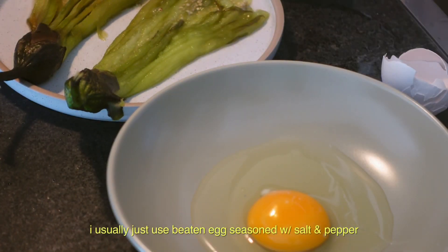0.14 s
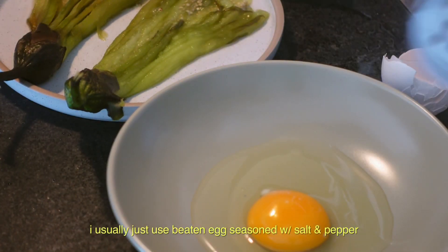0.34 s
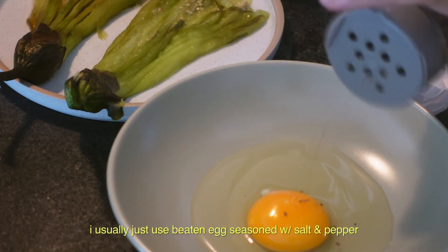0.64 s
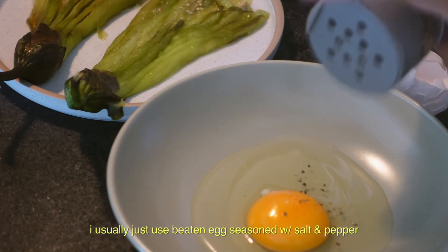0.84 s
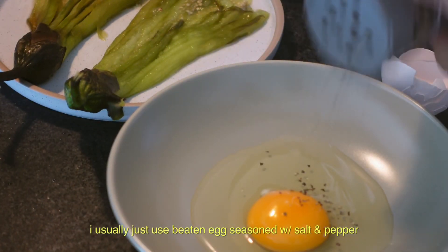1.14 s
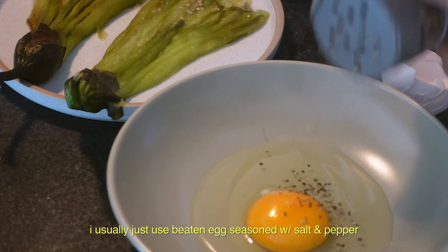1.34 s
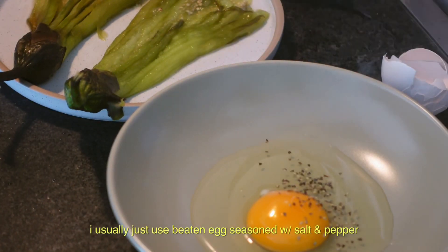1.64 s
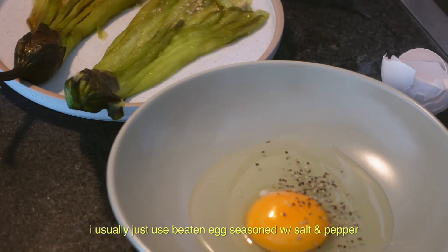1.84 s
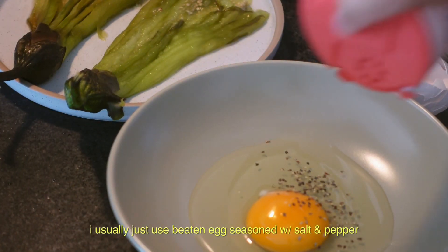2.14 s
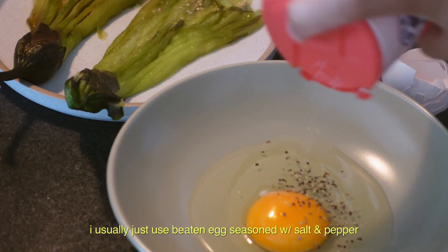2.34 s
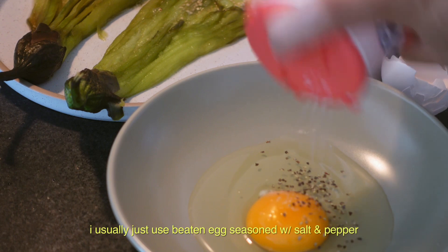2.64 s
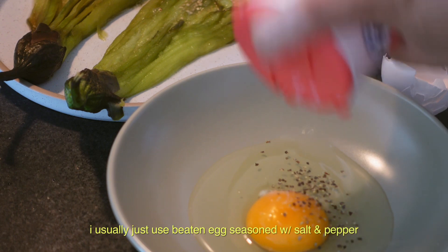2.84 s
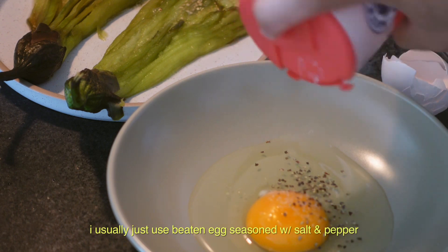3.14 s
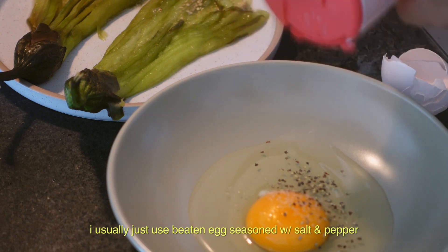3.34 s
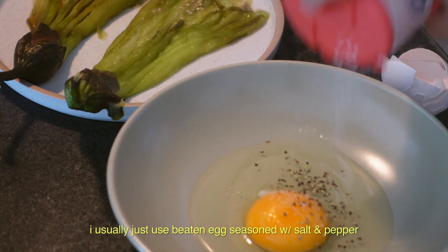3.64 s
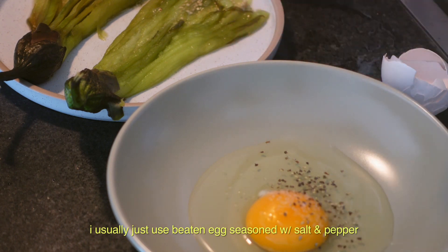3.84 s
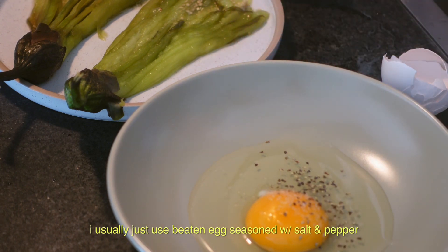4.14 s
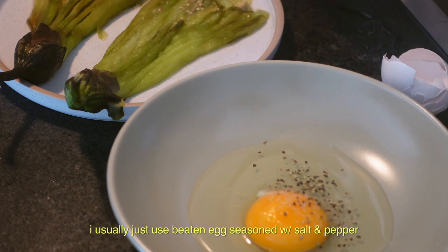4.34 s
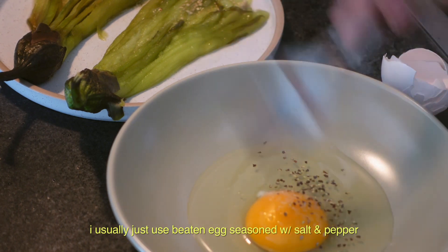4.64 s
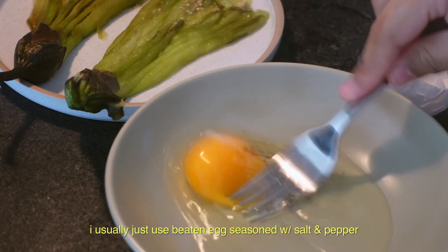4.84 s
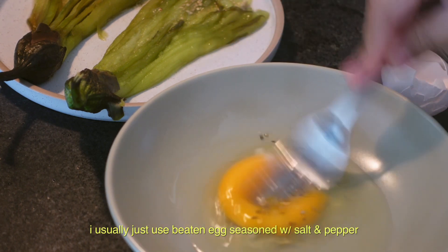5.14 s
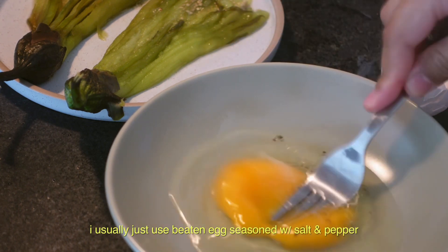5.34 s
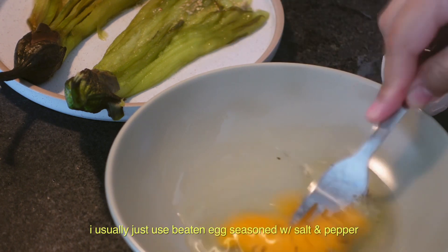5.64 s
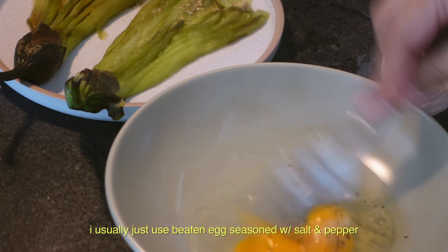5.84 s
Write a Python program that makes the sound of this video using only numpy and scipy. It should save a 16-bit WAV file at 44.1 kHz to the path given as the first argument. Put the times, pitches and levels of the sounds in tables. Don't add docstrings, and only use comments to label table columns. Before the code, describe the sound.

In a quiet kitchen, faint pepper shakes give way to brighter salt shakes, a sudden cut, then fork clinks and loud beating strokes.

```python
import sys
import numpy as np
from scipy import signal
from scipy.fft import rfft, irfft, next_fast_len
from scipy.io import wavfile
from scipy.ndimage import uniform_filter1d

SR = 44100
rng = np.random.default_rng(int(sys.argv[2]) if len(sys.argv) > 2 else 0)


def int16_out(signal):
    q = np.round(np.clip(np.atleast_2d(signal).T, -1, 1) * 32767)
    wavfile.write(sys.argv[1], SR, q.astype(np.int16))


def makeup_ratio(level_db):
    decades = np.asarray(level_db, float) / 20
    return 10 ** decades


N = 263718
CUT_S = 4.245


TRICKLE_DB = -83


def tumbling_grains(rows, times, tone, low_hz, high_hz, impacts, rattle_db):
    start, tipped, end = times
    t = np.arange(start, end, 1 / SR)
    power = swells(t, rows)
    flow = power.sum(0) + makeup_ratio(TRICKLE_DB) ** 2

    lag_s, tipping_s, upright_db = .02, .07, -19
    keep = np.exp(-1 / (lag_s * SR))
    lagged_flow = signal.lfilter([1 - keep], [1, -keep], flow)
    upright = np.clip((tipped - t) / tipping_s, 0, 1)
    rattle = makeup_ratio(rattle_db + upright_db * upright) * np.sqrt(lagged_flow)
    sizzle_over_flow = makeup_ratio([row[-1] for row in rows]) ** 2
    sizzle = np.sqrt(sizzle_over_flow @ power + makeup_ratio(TRICKLE_DB - 7) ** 2)

    def low(f):
        return 1 / (1 + (f / low_hz) ** 8)

    def high(f):
        return 1 - 1 / (1 + (f / high_hz) ** 12)

    def middle(f):
        return abs(1 - low(f) - high(f))

    x = impacts(len(t))
    total = np.zeros(len(t))
    for share, gain in [(low, rattle), (middle, np.sqrt(flow)), (high, sizzle)]:
        band = coloured(x, lambda f: makeup_ratio(read(tone[:-1], f)) * (f < 15850) * np.sqrt(share(f)))
        total += evened(band) * gain
    return start, total * signal.windows.tukey(len(t), .004)


# (peak time [s], grain flow [dB], rise [s per 10 dB], fall [s per 10 dB], sizzle over flow [dB])
PEPPER = [(0.002, -62, .01, .03, -16), (0.05, -68, .05, .045, -5), (0.25, -71, .03, .2, 1),
          (0.332, -56.5, .03, .038, -11), (0.474, -61.5, .045, .03, -4), (0.588, -62, .05, .04, -11),
          (1.058, -61.5, .055, .06, -11), (1.13, -62, .025, .03, -11), (1.182, -54, .009, .045, -9),
          (1.275, -67, .03, .085, -10), (1.645, -61, .022, .13, -8), (1.833, -66.5, .03, .015, -8)]
SALT = [(1.948, -46.5, .028, .2, -11), (2.07, -41.5, .12, .12, -10), (2.218, -41.5, .12, .08, -13),
        (2.376, -47, .2, .06, -11), (2.48, -38, .025, .018, -13), (2.62, -42.5, .13, .06, -10),
        (2.744, -46.5, .15, .055, -8), (2.816, -47.5, .013, .1, -8), (2.888, -42.5, .08, .045, -7),
        (3.018, -35, .055, .034, -8), (3.164, -52.5, .2, .05, -10), (3.288, -55, .02, .03, -10),
        (3.375, -41, .009, .05, -6), (3.44, -34.5, .04, .085, -5), (3.56, -39, .03, .2, -9),
        (3.625, -38.5, .2, .05, -6), (3.795, -60, .05, .07, -14), (3.92, -54, .035, .15, -18),
        (4.135, -30.5, .095, .07, -16)]
# (frequency [Hz], level [dB per Hz])
PEPPER_TONE = [(1470, -60), (2500, -18), (2930, -8.5), (3290, -18.5), (4530, -18), (6090, -3), (6620, -5.5),
               (8320, -2), (15400, -13)]
SALT_TONE = [(590, -29), (1000, -25), (1490, -22), (1750, -14), (2080, -12), (2410, -4.5), (2710, -4.5),
             (2970, -5), (3730, -4.5), (6100, 4), (7930, 4), (12500, -1.5), (15400, -13)]
# (start [s], tipped over [s], end [s])
PEPPER_S = (0, .48, 1.9)
SALT_S = (1.88, 2.02, 4.25)


def shakers():
    out = np.zeros(N)
    pepper = tumbling_grains(PEPPER, PEPPER_S, PEPPER_TONE, 5200, 10300,
                             lambda n: grit(n, 2.5, 9000), rattle_db=-6)
    salt = tumbling_grains(SALT, SALT_S, SALT_TONE, 3990, 11140,
                           lambda n: grit(n, 0.59, 14000), rattle_db=-5)
    add(out, *pepper)
    add(out, *salt)
    return out


# (frequency [Hz], width [Hz], level [dB])
BOWL = [(543, 54, -0.5), (756, 51, 3), (1194, 88, 4), (1804, 48, -8), (1900, 54, -13)]


def strike(row, peaks, crack_db, tick, rise_s=.0002):
    s, peak_db, drag_db, drag_s, tilt_db, bowl_db = row
    t = np.arange(int(.35 * SR)) / SR
    peaks = [(hz, np.hypot(width, 45.), db) for hz, width, db in peaks]

    chatter = np.exp(-t / 0.0049) * (1 - np.exp(-t / rise_s))
    release = 1 + np.exp(np.clip((t - drag_s) / 0.0065, -30, 30))
    drag = makeup_ratio(drag_db - 52 * t) / release * (1 - np.exp(-t / (6 * rise_s)))
    glaze = [(3100, 1400, 5.5), (4070, 22000, 1.5)]  # (frequency [Hz], width [Hz], level [dB])
    rub = evened(coloured(grit(len(t), 3.6, 15000), lambda f: humps(glaze, f)))
    force = grit(len(t), 2.87, 22000) * chatter + rub * drag + tick * (t == 0)

    def edges(f):
        tilt = makeup_ratio(tilt_db * np.log2((f + 2000) / 6000))
        return tilt / np.sqrt((1 + (2960.0 / (f + 1)) ** 8) * (1 + (f / 11300.0) ** 4))

    ringing = causal(lambda f: np.hypot(humps(peaks, f), makeup_ratio(crack_db)) * edges(f))
    body = causal(lambda f: humps(BOWL, f) ** 1.37 * f / (f + 400))
    sound = signal.fftconvolve(force, ringing)[:len(t)]
    low = signal.fftconvolve(force, body)[:len(t)]
    return s, makeup_ratio(peak_db) * (sound / abs(sound).max() + makeup_ratio(bowl_db) * low / abs(low).max())


# (frequency [Hz], width [Hz], level [dB])
SLIDE_TINES = [(3140, 26, 4), (5230, 70, -1), (5990, 45, -19), (7120, 63, -10), (7690, 100, -10),
               (8080, 77, -14), (9670, 60, -17), (10300, 45, -9), (12600, 110, -19), (13500, 82, -21)]
SLIDE_BOWL = [(763, 67, -0.5), (1060, 46, 2.5), (1260, 49, -1.5), (1780, 39, -6.5)]
# (peak time [s], level [dB], rise [s per 10 dB], fall [s per 10 dB])
SQUEAL = [(4.72, -54, .035, .2), (4.775, -48.5, .08, .14)]
RUMBLE = [(4.61, -63, .01, .1), (4.76, -51, .09, .25)]
SLIDE_S = 4.58, 4.855
# (time [s], peak [dB], drag under the blow [dB], drag [s], tilt [dB per octave])
BLOWS = [
    (4.8604, -26.5, -18, 0.053, 2.3),
    (5.1243, -34.5, -3.5, 0.011, 6.3),
    (5.1648, -20.5, -20, 0.053, 0.5),
    (5.2961, -15, -17.5, 0.057, 3.5),
    (5.6155, -7.5, -13, 0.07, -2.1),
    (5.7866, -2.5, -18.5, 0.08, -3.8),
    (5.949, -2.5, -10.5, 0.084, -2.2),
]
# (frequency [Hz], width [Hz], level [dB])
TAP_RINGS = [
    [(3400, 33, 10), (5280, 45, 3), (7270, 66, 12), (7900, 23, -8), (8380, 27, 0.5), (9980, 80, 5.5),
     (10100, 45, -14)],
    [(3210, 61, 9), (12300, 130, -14)],
    [(3170, 93, 1), (4520, 100, -15), (5160, 66, -14), (7200, 27, -3.5), (7050, 57, -3), (8360, 32, -4),
     (9200, 79, -5), (9740, 53, -7), (11300, 27, -8), (11800, 32, -11), (12500, 170, -7)],
    [(3240, 86, 8.5), (3250, 32, -5), (5050, 120, -3.5), (6896, 70, 1), (7370, 65, 0), (8100, 110, -6),
     (9100, 77, -6), (9640, 51, 1), (10090, 55, 3.5), (11500, 29, -3), (12300, 48, -4)],
]
BEAT_RINGS = [
    [(2965, 45, -11), (3170, 21, -6.5), (3416, 20, 2), (5130, 69, -9), (6100, 76, -5), (6860, 170, -4.5),
     (7790, 59, -4), (7440, 200, -2.5), (8000, 36, -5), (9830, 56, -5), (10120, 42, -4), (11500, 240, -11),
     (12800, 68, -4), (13300, 48, -15)],
    [(3260, 60, -6.5), (3520, 23, -10), (4310, 100, -11), (5330, 150, -10), (6070, 30, -11),
     (6700, 31, -4.5), (7250, 46, -3.5), (7560, 43, -9), (7960, 63, 1), (9400, 26, -7.5), (10200, 47, -2.5),
     (11500, 42, -2), (12500, 89, -6), (13400, 290, -12.5)],
    [(3410, 65, -8.5), (4130, 89, -10.5), (6210, 23, -8), (7270, 43, -6.5), (8200, 19, -1.5),
     (10520, 47, -5), (12150, 23, -4)],
]
# (time [s], peak [dB], drag [s])
SCUFFS = [
    (5.012, -30.5, .03),
    (5.463, -40, .014),
    (5.485, -29.5, .018),
    (5.505, -44, .09),
]
# (frequency [Hz], width [Hz], level [dB])
SCUFF_RINGS = [[(2400, 62, -8), (3265, 90, -6.5), (5140, 66, -8), (7260, 37, -5), (8060, 74, -8),
               (9780, 30, -2), (12000, 61, -8)]] + [[(2410, 350, -4), (3250, 180, -3), (5060, 150, -4),
               (6240, 160, 3.5), (7160, 200, -3)]] * len(SCUFFS)
# (time [s], level [dB], frequency [Hz], T60 [s])
PLOPS = [
    (5.726, -43, 2060, .16),
    (5.726, -35, 2250, .015),
    (5.788, -48.5, 1162, 1.2),
    (5.788, -49.5, 1168.5, 1.2),
    (4.862, -58, 8200, .7),
]


def fork():
    out = np.zeros(N)
    t = np.arange(*SLIDE_S, 1 / SR)
    rub = grit(len(t), 1.0, 5100)
    for peaks, rows in (SLIDE_TINES, SQUEAL), (SLIDE_BOWL, RUMBLE):
        singing = evened(coloured(rub, lambda f: humps(peaks, f) ** 1.25))
        pressure = np.sqrt(swells(t, rows).sum(0))
        add(out, t[0], singing * pressure * signal.windows.tukey(len(t), .06))

    for row, peaks in zip(BLOWS, TAP_RINGS + BEAT_RINGS):
        peak_db, tilt_db = row[1], row[-1]
        bowl_db = -45 - 3 * tilt_db - peak_db
        add(out, *strike((*row, bowl_db), peaks, crack_db=-21, tick=5.36))
    for (s, db, drag_s), peaks in zip(SCUFFS, SCUFF_RINGS):
        row = s, db, 3.5, drag_s, -.5, -31
        add(out, *strike(row, peaks, crack_db=-31, tick=0, rise_s=0.0025))

    t = np.arange(8000) / SR
    for s, db, hz, t60 in PLOPS:
        onset = 1 - np.exp(-t / 0.00052)
        add(out, s, makeup_ratio(db - 60 * t / t60) * np.sin(2 * np.pi * hz * t) * onset)
    return out


def knock(row, peaks):
    s, peak_db, rattle_db, rattle_s = row
    t = np.arange(6000) / SR
    force = rng.standard_normal(len(t)) * makeup_ratio(rattle_db) * np.exp(-t / rattle_s)
    force[[0, 75]] += 1, .7
    shell = causal(lambda f: humps(peaks, f) ** 1.45 * f / (f + 900) / (1 + (f / 34000.0) ** 4))
    sound = signal.fftconvolve(force, shell)[:len(t)]
    return s, makeup_ratio(peak_db) * sound / abs(sound).max()


# (time [s], peak [dB], after-rattle [dB], after-rattle decay [s])
KNOCKS = [
    (1.829, -54.5, -25, .01),
    (3.6453, -12.5, -20, 0.0042),
    (4.1363, -19, -21, .01),
]
# (frequency [Hz], width [Hz], level [dB])
LID = [
    [(2220, 150, -3), (2830, 150, -6), (3600, 200, -11)],
    [(1300, 200, -26), (2330, 320, -2), (3150, 300, -6), (4950, 350, -5), (6700, 400, -6), (8200, 400, -4),
     (10200, 400, -7)],
    [(790, 270, -4), (1120, 310, -3), (2050, 200, -6), (2690, 130, -2), (4640, 540, 4), (6400, 400, 1)],
]


def lid_knocks():
    out = np.zeros(N)
    for row, peaks in zip(KNOCKS, LID):
        add(out, *knock(row, peaks))
    return out


# (frequency [Hz], width [Hz], level [dB])
DYING = [(1350, 87, -16), (2280, 55, -4.5), (2870, 106, -7), (4170, 110, -6.5), (5070, 65, -15),
         (5290, 61, -13), (5500, 40, -8), (6230, 66, 0.5), (7400, 91, -8), (8530, 56, -3.5),
         (9050, 120, -14), (9720, 140, -11), (11900, 160, -26), (12500, 42, -24)]
# (frequency [Hz], T60 [s])
DYING_T60 = [(1000, 1.2), (3000, 1.08), (6000, 0.41), (9000, 0.46), (13000, 0.32)]


def dying_ring():
    hz, t, z = signal.stft(rng.standard_normal(SR), SR, nperseg=512)
    floor = makeup_ratio(-17) * hz / (hz + 12000) * (hz < 14000)
    modes = np.hypot(humps(DYING, hz), floor)[:, None]
    decay = makeup_ratio(-60 * t / read(DYING_T60, hz)[:, None])
    tail = signal.istft(z * modes * decay, SR, nperseg=512)[1]
    out = np.zeros(N)
    add(out, CUT_S, makeup_ratio(-40) * tail / np.std(tail[:2000]))
    return out


# (frequency [Hz], T60 [s])
KITCHEN = [(300, 1), (2000, 0.68), (6000, 0.45), (14000, 0.39)]


def kitchen(x, damping=1):
    taps = np.zeros((2, SR // 2))
    at = np.arange(120, SR // 2 - 20, 20) + rng.integers(0, 20, (2, (SR // 2 - 121) // 20))
    np.put_along_axis(taps, at, rng.choice([-1., 1.], at.shape), 1)
    taps[1] = .85 * taps[0] + .5 * taps[1]
    hz, t, z = signal.stft(taps, SR, nperseg=256)
    decay = makeup_ratio(-60 * damping * t / read(KITCHEN, hz)[:, None])
    tail = signal.istft(z * decay, SR, nperseg=256)[1]
    tail = tail / np.linalg.norm(tail, axis=1)[:, None]
    return signal.fftconvolve(x[None], tail, axes=1)[:, :N]


# (peak time [s], level [dB], rise [s per 10 dB], fall [s per 10 dB],
# frequency [Hz])
HUM = [
    (0.6, -64, .3, .4, 200),
    (2.5, -59, .3, .45, 202),
    (4.29, -53, .04, .15, 205),
    (4.56, -52, .25, .25, 202),
    (5.3, -56, .15, .6, 215),
    (5.9, -60, .4, .3, 243),
]


def drone():
    noise = rng.standard_normal(N)
    bands = [evened(coloured(noise, lambda f: humps([(row[-1], 24, 0)], f) ** 2)) for row in HUM]
    return (np.sqrt(swells(np.arange(N) / SR, HUM)) * bands).sum(0)


# (frequency [Hz], width [Hz], level [dB], fade end [s])
WHINES = [
    (118.4, 6, -70, 4.24),
    (1777, 14, -77, 1.68),
    (5981, 14, -77, 4.24),
    (6202, 14, -81, 4.24),
    (5243, 14, -87, 4.24),
]


def appliances():
    t, out = np.arange(N) / SR, np.zeros(N)
    for hz, width, db, end in WHINES:
        fuzz = evened(coloured(rng.standard_normal(N), lambda f: humps([(hz, width, 0)], f) ** 2))
        whine = 0.96 * np.sin(2 * np.pi * hz * t) + 0.45 * fuzz
        out += makeup_ratio(db) * whine * np.clip((end - t) / 0.024, 0, 1)
    return out


# (frequency [Hz], coherence [0-1])
SAME = [(60, 1), (180, 0.88), (550, 0.77), (1650, 0.76), (4970, 0.74), (15000, 0.99)]


def hush(tone, db):
    frames, hz = N // 256 + 9, np.fft.rfftfreq(1024, 1 / SR)
    a, b, c, d, patches = rng.standard_normal((frames, 513, 5)).T
    patches = uniform_filter1d(patches, size=8, axis=0)
    patches = evened(uniform_filter1d(patches, size=14, axis=1))
    same = np.clip(read(SAME, hz), -1, 1)[:, None]
    left = a + 1j * b
    right = same * left + np.sqrt(1 - same ** 2) * (c + 1j * d)
    z = np.array([left, right]) * makeup_ratio(read(tone, hz)[:, None] + 1.65 * patches)
    return makeup_ratio(db) * evened(signal.istft(z, nperseg=1024, noverlap=768)[1][:, :N])


def evened(x):
    return x / np.sqrt(np.mean(x ** 2) + 1e-20)


def read(points, hz):
    f, value = np.transpose(points)
    return np.interp(np.log(hz + 1), np.log(f + 1), value)


def add(mix, s, sound):
    part = mix[round(s * SR):][:len(sound)]
    part += sound[:len(part)]


def coloured(x, gain):
    size = next_fast_len(len(x), True)
    return irfft(rfft(x, size) * gain(np.fft.rfftfreq(size, 1 / SR)), size)[:len(x)]


def humps(peaks, hz):
    return np.sqrt(sum(makeup_ratio(db) ** 2 / (1 + (2 * (hz - f) / width) ** 2) for f, width, db in peaks))


def grit(size, spread_db, per_s):
    big = makeup_ratio(spread_db * np.minimum(rng.exponential(1, size), 4))
    return evened(rng.standard_normal(size) * big * (rng.random(size) < per_s / SR))


def causal(gain, size=8192):
    cepstrum = irfft(np.log(gain(np.fft.rfftfreq(size, 1 / SR)) + 1e-5), size)
    cepstrum[1:size // 2] *= 2
    cepstrum[size // 2 + 1:] = 0
    response = irfft(np.exp(rfft(cepstrum)), size)
    return response / np.linalg.norm(response)


def swells(t, rows):
    s, db, rise_s, fall_s = np.transpose(rows)[:4, :, None]
    after_last = t > np.vstack([[-np.inf], s[:-1]])
    before_next = t < np.vstack([s[1:], [np.inf]])
    power = makeup_ratio(db - 10 * np.where(t < s, (s - t) / rise_s, (t - s) / fall_s)) ** 2
    return abs(uniform_filter1d(power * (after_last & before_next), size=200, axis=1))


# (frequency [Hz], level [dB per Hz])
HUSH_BEFORE = [(18, -67), (30, -47), (88, -6), (194, -2.5), (473, -19.5), (684, -16), (937, -23),
               (1010, -19.5), (1500, -26), (1810, -21.5), (2680, -29.5), (6210, -34.5), (6720, -47),
               (9220, -37), (16000, -65)]
HUSH_AFTER = [(18, -57), (30, -15.5), (210, -8), (311, -16.5), (721, -23), (1960, -23.5), (2230, -23),
              (3670, -45), (5170, -33), (5590, -34), (6050, -27), (6900, -41), (9460, -39), (14000, -50),
              (16000, -66)]
# (time [s], left over right [dB])
PAN = [
    (1.9, -.8),
    (4.37, -1.5),
    (4.47, -8),
    (4.66, -1),
    (5.98, 0.5),
]


def scene():
    t = np.arange(N) / SR
    after = np.clip((t - CUT_S) / 0.0031, 0, 1)
    shake, tap, beat, ring = shakers(), lid_knocks(), fork(), dying_ring()
    pan_db = np.interp(t, *np.transpose(PAN)) / 2
    ears = makeup_ratio([pan_db, -pan_db])

    first = (shake + tap) * ears + makeup_ratio(-18) * kitchen(shake) + makeup_ratio(-8.5) * kitchen(tap, damping=1.8)
    first = first + hush(HUSH_BEFORE, -61) + appliances()
    second = beat * ears + makeup_ratio(-8) * kitchen(beat)
    second = second + np.array([ring, np.roll(ring, 2)]) * ears
    second = second + hush(HUSH_AFTER, -56.5)
    return first * (1 - after) + second * after + drone()


def low_pass(x):
    return signal.sosfilt(signal.butter(12, 16530, fs=SR, output="sos"), x)


def record(dry):
    cut = np.array([coloured(x, lambda f: 1 / np.sqrt(1 + (69.0 / (f + 1)) ** 8)) for x in dry])
    return low_pass(cut)


dry = scene()
out = record(dry)
int16_out(out)
```